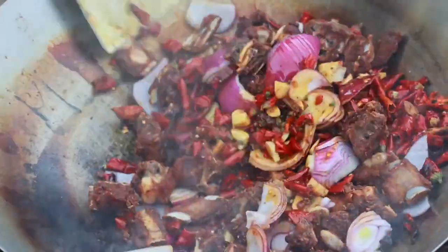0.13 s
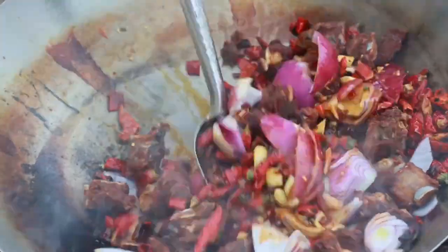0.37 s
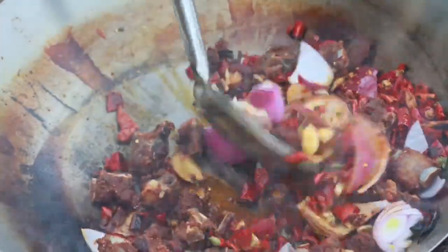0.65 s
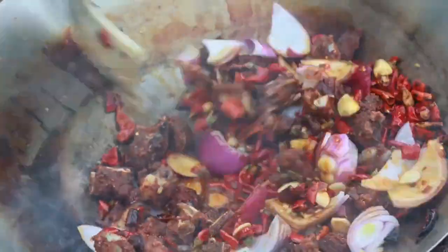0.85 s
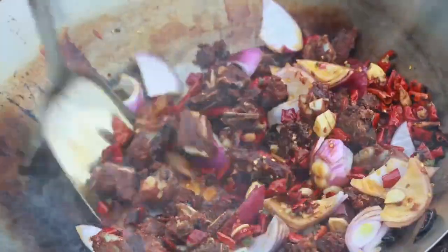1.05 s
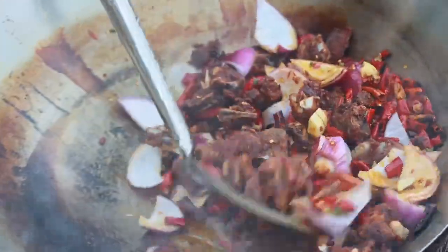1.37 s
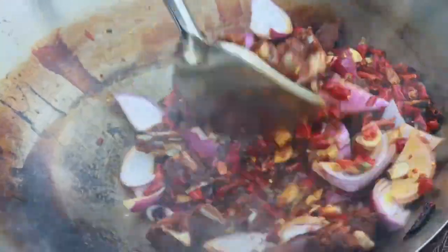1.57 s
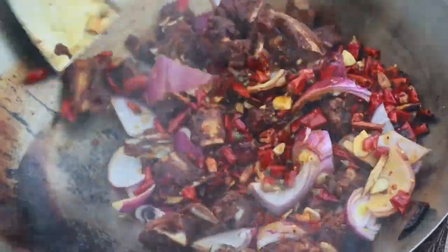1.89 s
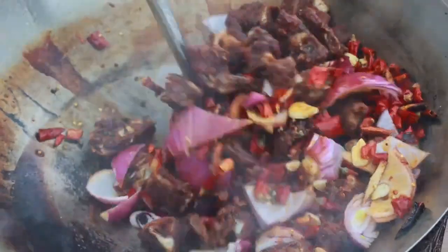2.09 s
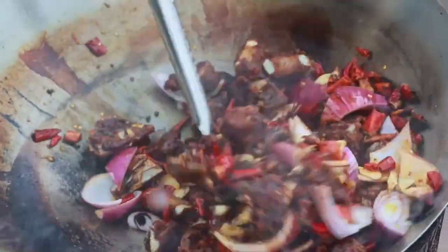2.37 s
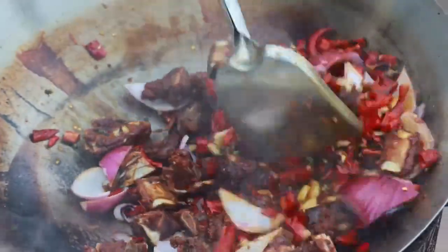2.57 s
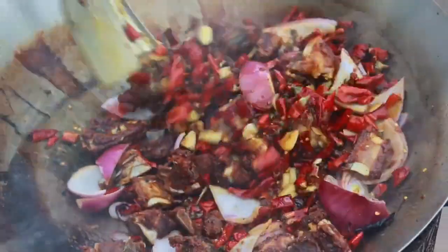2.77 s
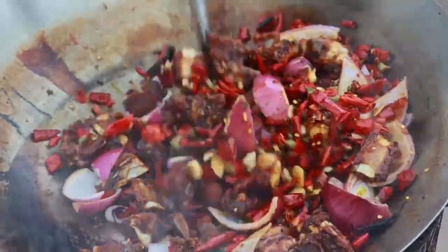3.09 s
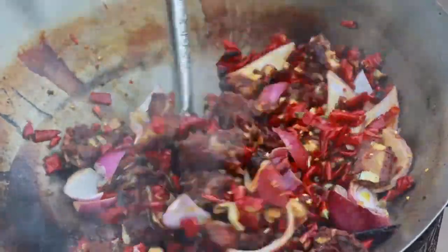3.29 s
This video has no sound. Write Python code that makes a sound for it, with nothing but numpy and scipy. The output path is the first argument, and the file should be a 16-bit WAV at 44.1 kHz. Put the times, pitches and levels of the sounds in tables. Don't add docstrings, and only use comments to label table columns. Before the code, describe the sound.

A metal spatula knocks and scrapes in a hot wok while food sizzles and spits.

```python
import sys
import numpy as np
from scipy import signal
from scipy.fft import rfft, irfft
from scipy.io import wavfile
from scipy.ndimage import uniform_filter1d

SR = 44100
rng = np.random.default_rng(int(sys.argv[2]) if len(sys.argv) > 2 else 0)


def master_out(mix):
    frames = np.transpose(np.atleast_2d(mix))
    ceiling = np.clip(frames, -1, 1)
    pcm = np.round(ceiling * 32767).astype(np.int16)
    wavfile.write(sys.argv[1], SR, pcm)


def volts(x):
    e = np.asarray(x, float) / 20
    return 10 ** e


N = 152145

# (time [s], peak [dB], centre of the tones [Hz], spread [octaves], ring factor [-])
KNOCKS = [(0.185, -11, 2950, 0.16, 0.51), (0.22, -13, 2950, 0.2, 0.46), (0.303, -8, 2304, 0.56, 0.55),
          (0.361, -8, 1890, 0.65, 0.34), (0.381, -16, 1750, 0.4, 0.51),
          (0.4262, -8.5, 1940, 0.23, 0.29), (0.49, -12, 2125, 0.36, 0.45),
          (0.681, -16.5, 1490, 0.49, 0.15), (1.124, -9.5, 2640, 0.4, 0.71),
          (1.226, -15, 3290, 0.58, 0.36), (1.235, -11.5, 2460, 0.75, 0.59),
          (1.271, -14, 2690, 0.4, 0.46),
          (1.9714, -11.5, 3200, 0.24, 1), (1.982, -12.5, 2950, 0.21, 1.0),
               (2.067, -8.5, 2890, 0.46, 0.27), (2.0887, -8, 1815, 0.49, 0.39),
               (2.3115, -21, 1700, 0.6, 0.46), (2.339, -22, 3150, 0.27, 0.45), (2.431, -17, 2300, 0.6, .7),
               (3.026, -13.5, 3160, 0.36, 0.72), (3.094, -7.5, 2300, 0.706, 0.52),
               (3.143, -20, 1920, 0.33, 0.7), (3.16, -11, 1904, 0.6, 0.4), (3.248, -14, 2190, 0.73, 0.25),
               (3.31, -22, 1230, 0.31, 0.62)]
# (pitch [Hz], level [dB], time to fall 60 dB [s])
METAL_TONES = [(926, 0, 0.27), (1252, -6, 0.024), (1560, -4, 0.025), (1835, 3, 0.074), (1970, 0, 0.098),
               (2114, -3.5, 0.057), (2490, -4.5, 0.038), (2708, 3.5, 0.041), (2950, 2, 0.058),
               (3105, 4, 0.11), (3380, 7, 0.08), (3740, 3, 0.03), (4160, 9.5, 0.048), (4500, 15, 0.036)]
# (time [s], pitch [Hz], level [dB], time to fall 60 dB
# [s], free for [s])
FREE_RINGS = [(1.972, 2750, -27.5, 0.34, 0.094), (2.088, 1061, -29, 0.57, .12), (2.09, 765, -37.5, 1.3, .9),
              (2.724, 1072, -38.5, 1.3, 0.065), (2.32, 765, -46, 4.2, .9), (.303, 8430, -26, .05, .05),
              (.305, 1812, -18.5, 0.18, 0.033), (.426, 2490, -12.5, 0.027, .03), (.49, 2138, -30, 0.1, .05),
              (3.094, 1973, -11.5, 0.052, 0.012), (3.144, 1818, -21, 0.21, .06), (3.16, 1853, -14, 0.2, .01)]
# (time [s], peak [dB], pitch [Hz], time to fall 60 dB [s])
CLINKS = [(.323, -20.5, 1850, .08), (.395, -27, 2160, 0.055), (.465, -24.5, 1460, 0.026),
          (.491, -28, 947, .06), (.52, -33, 2150, .08), (0.687, -30.5, 2950, 0.053), (.682, -30.5, 950, .1),
          (1.1245, -18.5, 3320, .03), (1.129, -22.5, 1900, 0.036), (1.15, -34, 2200, .1),
          (1.196, -27, 3760, .04), (1.225, -20, 4490, .05), (1.225, -24.5, 1783, 0.15),
          (1.234, -21.5, 4390, 0.045), (1.236, -23, 2505, 0.071), (1.26, -24, 2520, .04),
          (1.271, -26, 1390, 0.05), (1.30, -27.5, 1300, .03), (1.357, -28, 1660, 0.045),
          (1.358, -30, 896, 0.035), (1.425, -33, 2853, 0.067), (1.425, -34, 2400, 0.046),
          (2.031, -34.5, 2460, .12), (2.033, -38, 1840, 0.22), (2.09, -19, 2780, 0.036),
          (2.15, -25, 1800, 0.076), (2.166, -23, 2410, .06), (2.176, -17.5, 2826, .03),
          (2.175, -23, 1676, 0.068), (2.189, -27, 1390, 0.1), (2.208, -30, 2630, .03),
          (2.25, -27, 2800, .07), (2.25, -35, 1840, 0.054), (2.431, -22, 1758, 0.058),
          (2.687, -31, 2380, 0.14), (2.69, -26.5, 3262, .06), (2.724, -27, 3400, 0.071),
          (3.103, -19, 2145, 0.079), (3.122, -30, 1970, 0.17), (3.143, -26, 2620, .12),
          (3.143, -23, 3480, 0.056), (3.189, -23.5, 1754, 0.076), (3.208, -23, 2640, .06),
          (3.232, -28, 880, 0.051), (3.248, -22, 1575, 0.033), (3.269, -27.5, 1264, .06)]
# (time [s], rise [s], fall [s], level [dB], centre pitch [Hz])
STROKES = [(.302, 0.0028, 0.057, -25.5, 2780), (.38, 0.019, 0.059, -29, 2230),
           (.49, 0.0041, 0.056, -31, 2110), (0.674, 0.0071, 0.068, -32, 2320),
           (1.124, 0.0045, .05, -31.5, 2600), (1.186, 0.05, 0.093, -30, 3100),
           (1.27, 0.055, 0.079, -33, 2220), (2.065, 0.012, 0.11, -23.5, 2290),
           (2.13, 0.053, 0.047, -26, 2800), (2.199, 0.061, 0.032, -32.5, 2300),
           (2.32, 0.018, 0.26, -35, 2840), (2.682, 0.026, 0.077, -32, 2940),
           (3.095, 0.0025, 0.076, -26, 2480), (3.165, 0.032, 0.096, -27, 3050),
           (3.255, 0.0094, 0.075, -33.5, 2000)]
# (peak time [s], half length [s], level [dB])
GRIT = [
    (0.307, 0.0062, -20.5),
    (1.226, 0.034, -29.5),
    (2.18, 0.018, -27.5),
    (3.208, 0.018, -26.5),
]
# (time [s], peak [dB], pitch [Hz])
THUDS = [(.183, -17.5, 645), (0.236, -28, 684), (.304, -22, 880), (1.084, -38, 450), (1.124, -29, 616),
         (1.178, -29.5, 413), (1.233, -23, 510), (1.267, -28, 410), (1.316, -32.5, 520),
         (1.542, -38.5, 290), (1.982, -24, 430), (2.054, -29.5, 443), (2.067, -24, 454),
         (2.156, -25.5, 525), (2.311, -27, 620), (3.094, -18, 920), (3.184, -31.5, 500)]
# (time [s], peak [dB], level of the lower part [dB])
SPITS = [
    (.2483, -12, 0),
    (.2788, -7, -20),
    (.8042, -16, 6),
    (1.1278, -12, -3),
    (2.0896, -12, 8),
    (2.4952, -8, -6),
    (2.6735, -25, 6),
    (2.7655, -23, 7),
    (2.9248, -1, -13),
    (2.9685, -21, 6),
]
# (time [s], level [dB])
HEAT = [(0, -34.5), (.25, -36), (.45, -36.5), (.7, -34.5), (1., -35), (1.4, -38), (1.62, -37), (1.93, -39),
        (2.3, -37), (2.75, -35), (3.05, -37.5), (3.45, -38.5)]
# (frequency
# [Hz], level [dB])
HIGH_COLOUR = [(3000, -7.5), (5500, -4.5), (6400, -6.5), (8500, 0), (10200, -12), (12000, -3.5),
               (14200, -5.5), (16000, -13.5)]
# (frequency [Hz], level [dB])
SIMMER_COLOUR = [(410, -32), (700, -15), (816, -6.5), (1530, 0.5), (2020, -2), (2720, 3), (6000, -6.5),
                 (7800, -52), (13200, -120)]
# (frequency [Hz], level [dB])
FIRE_COLOUR = [(12, -49), (20, -36), (102, -14.5), (160, -3.5), (228, -13), (300, -17), (381, -16),
               (900, -14.5), (1170, -24), (1980, -120)]


def evened(x):
    return x / np.sqrt(np.mean(x ** 2) + 1e-20)


def add(mix, s, sound):
    part = mix[round(s * SR):][:len(sound)]
    part += sound[:len(part)]


def colour(x, points):
    f, db = np.transpose(points)
    hz = np.fft.rfftfreq(len(x), 1 / SR)
    gain_db = np.interp(np.log(hz + 1), np.log(f + 1), db, -90, -90)
    return irfft(rfft(x) * volts(gain_db), len(x))


def drift(hz):
    smooth = uniform_filter1d(rng.standard_normal(N), 200)
    return evened(signal.lfilter([1], [1, -np.exp(-2 * np.pi * hz / SR)], smooth))


def bubbles(per_s, spread_db, hiss):
    size = volts(spread_db * np.minimum(rng.exponential(1, N), 4))
    size = size * (rng.random(N) < per_s / SR)
    burst = signal.lfilter([1], [1, -.93], size) * rng.standard_normal(N)
    return evened(burst) + hiss * rng.standard_normal(N)


def ring(hz, t60, t, phase=0):
    return volts(-60 * t / t60) * np.sin(2 * np.pi * hz * t + phase)


def weight(hz, centre_hz, octaves):
    return np.exp(-.5 * (np.log2(hz / centre_hz) / octaves) ** 2)


def knocks():
    scatter_db, cluster_t60, crack_db, crack_s = 2, 0.1, -15.5, 0.0044
    out, t = np.zeros(N), np.arange(6000) / SR
    for s, db, centre_hz, octaves, factor in KNOCKS:
        luck = rng.standard_normal((24, 2))
        lasting = sum(volts(d + scatter_db * a) * weight(f, centre_hz, octaves) * ring(f, t60 * factor, t)
                      for (f, d, t60), a in zip(METAL_TONES, luck[:, 0]))
        cluster = sum(np.exp(-a * a) * ring(centre_hz * 2 ** (octaves * a), cluster_t60 * factor, t, 3 * b)
                      for a, b in luck)
        contact = ring(centre_hz, 0.11 * factor, t)
        crack = signal.lfilter([1, -1], [1, -1.3, .45], rng.standard_normal(len(t))) * np.exp(-t / crack_s)
        sound = .5 * lasting / abs(lasting).max() + 0.66 * cluster / abs(cluster).max()
        sound = sound + 0.11 * contact + volts(crack_db) * crack
        add(out, s, volts(db) * np.minimum(t / 0.00029, 1) * sound)
    return out


def free_rings():
    damp_s, waver_db = 0.0053, 1.6
    out, t = np.zeros(N), np.arange(SR) / SR
    for s, hz, db, t60, free in FREE_RINGS:
        level = volts(db + waver_db * drift(15)[:SR])
        damped = np.exp(-np.maximum(t - free, 0) / damp_s)
        add(out, s, level * np.minimum(t / 0.0021, 1) * damped * ring(hz, t60, t))
    return out


def clinks():
    click_db, roughness = -6.5, .3
    out, t = np.zeros(N), np.arange(5000) / SR
    for s, db, hz, t60 in CLINKS:
        a, b = rng.uniform(-1.16, 1, 2)
        tone = ring(hz, t60, t) + 0.29 * ring(hz * (1 + 0.057 * a), 0.53 * t60, t, 3 * b)
        rattle = evened(uniform_filter1d(rng.standard_normal(len(t)), size=60))
        click = volts(click_db) * np.sin(2 * np.pi * 1.24 * hz * t) * np.exp(-t / 0.00045)
        add(out, s, volts(db) * (np.minimum(t / 0.0014, 1) * tone * (1 + roughness * rattle) + click))
    return out


def scrapes():
    patch_db, wander, octaves = 3.5, 0.024, 0.41
    out, tail, t = np.zeros(N), np.arange(3000) / SR, np.arange(0, .5, 1 / SR)
    for s, rise, fall, db, centre_hz in STROKES:
        shape = np.where(t < rise, (t / rise) ** 0.51, np.exp(-(t - rise) / fall * 1.38))
        slips = shape * bubbles(1500, 2.2, .7)[:len(t)]
        luck = np.repeat(rng.standard_normal((len(METAL_TONES), 64)), 400, axis=1)[:, :len(t)]
        body = np.zeros(len(t))
        for (f, d, t60), a in zip(METAL_TONES, luck):
            tone = ring(f * (1 + wander * a[0]), .5 * t60, tail)
            tone = volts(d) * weight(f, centre_hz, octaves) * tone
            body += signal.oaconvolve(slips * volts(patch_db * a), tone)[:len(t)]
        broad = colour(slips, [(300, -30), (centre_hz / 1.26, -10), (centre_hz, 0), (5000, -8), (15000, -30)])
        tumble = slips[::-1] * shape / (shape[::-1] + 1e-9)
        food = colour(tumble, [(90, -13), (200, -2.5), (550, 1.0), (1300, -9)])
        food_gain = volts(-13 + 0.74 * (db + 27))
        size = np.sqrt(np.mean(shape ** 2))
        sound = 0.64 * evened(body) + 0.66 * evened(broad) + food_gain * evened(food)
        add(out, s, volts(db) * size * sound)
    return out


def grit():
    t = np.arange(N) / SR
    edge = evened(colour(bubbles(1200, 3.5, .5), HIGH_COLOUR))
    return edge * sum(volts(db) * np.exp(-.5 * ((t - s) / half) ** 2) for s, half, db in GRIT)


def thuds():
    out, t = np.zeros(N), np.arange(3000) / SR
    for s, db, hz in THUDS:
        push = np.sin(2 * np.pi * hz * t) * np.exp(-t * hz / 1.02)
        puff = evened(colour(rng.standard_normal(len(t)), [(90, -13), (160, -0.5), (500, -8.0), (1200, -7)]))
        puff = puff * np.minimum(t / 0.0057, 1) * np.exp(-t / 0.019)
        add(out, s, volts(db) * (1.81 * push + 0.21 * puff))
    return out


def spits():
    out, t = np.zeros(N), np.arange(600) / SR
    for s, db, low_db in SPITS:
        snap = np.sin(2 * np.pi * 12800 * t) * np.exp(-t / .00016)
        snap = snap + .4 * np.sin(2 * np.pi * 8300 * t) * np.exp(-t / .0003)
        low = np.sin(2 * np.pi * 3200 * t) * np.exp(-t / .0002)
        tail = 0.095 * rng.standard_normal(len(t)) * np.exp(-t / 0.0028)
        burst = snap / abs(snap).max() + volts(low_db) * low + tail
        thin = signal.lfilter([1, -1], [1, -.9], burst)
        add(out, s + 0.0012, volts(db) * thin)
    return out


def sizzle():
    simmer_db, simmer_share, fire_db = -42, 0.93, -53
    s, db = np.transpose(HEAT)
    heat = np.interp(np.arange(N) / SR, s, db)
    change = heat - db.mean()
    fizz_level = volts(heat + .8 * drift(14))
    simmer_level = volts(simmer_db + simmer_share * change + 1.1 * drift(9))
    fire_level = volts(fire_db + change + 3.2 * drift(7))
    fizz = fizz_level * evened(colour(bubbles(2500, 1.3, 1.0), HIGH_COLOUR))
    simmer = simmer_level * evened(colour(bubbles(1500, 1.4, 1.0), SIMMER_COLOUR))
    fire = fire_level * evened(colour(bubbles(150, 3.0, 0.88), FIRE_COLOUR))
    return fizz + simmer + fire


def scene():
    metal = knocks() + free_rings() + clinks() + scrapes() + grit()
    return (metal + thuds() + spits() + sizzle())[None]


def roll_off(x):
    return signal.sosfilt(signal.butter(12, 16640, fs=SR, output="sos"), x)


def record(dry):
    x = signal.sosfilt(signal.butter(4, 100, "high", fs=SR, output="sos"), dry)
    x = x + volts(-73) * evened(signal.lfilter([1], [1, -.99], rng.standard_normal(x.shape)))
    x = .9 * np.tanh(x / .9)
    treble_limit = signal.firwin(511, 15600, window=("kaiser", 5), fs=SR)
    x = signal.oaconvolve(x, treble_limit[None], "same")
    return roll_off(x)


dry = scene()
out = record(dry)
master_out(out)
```